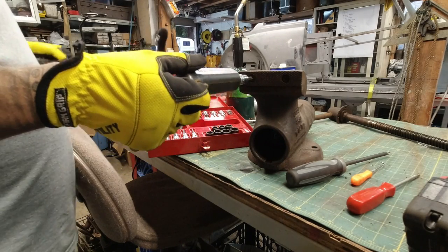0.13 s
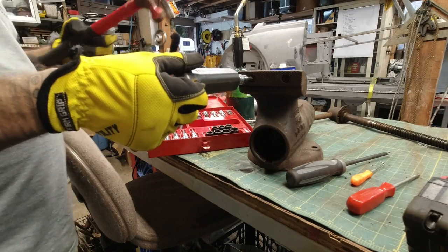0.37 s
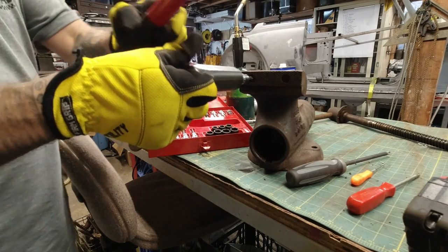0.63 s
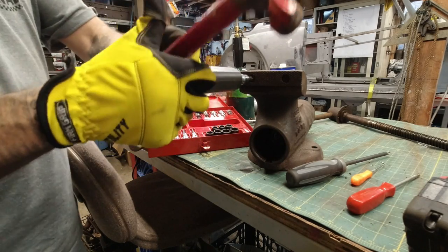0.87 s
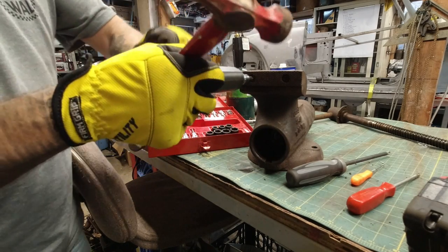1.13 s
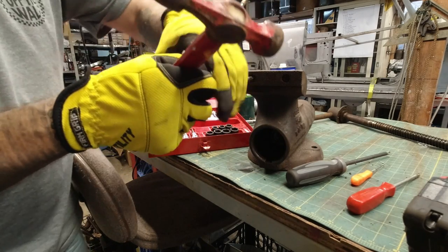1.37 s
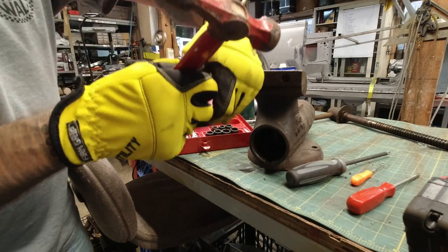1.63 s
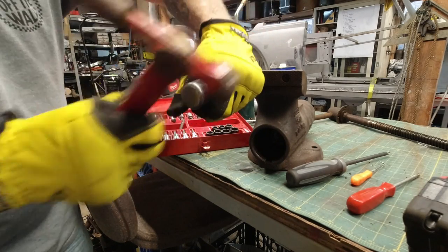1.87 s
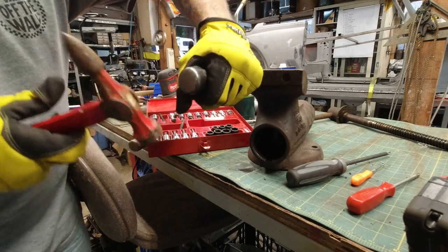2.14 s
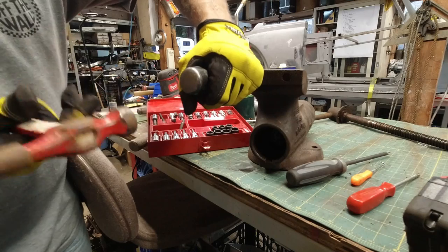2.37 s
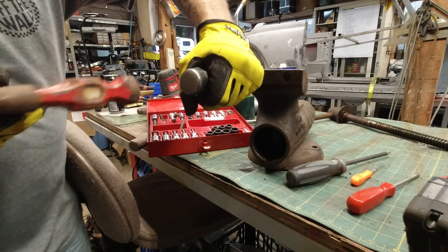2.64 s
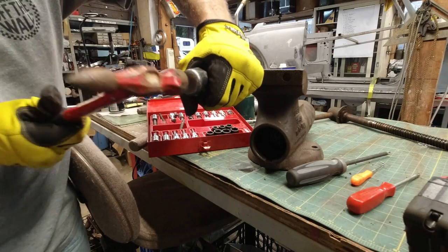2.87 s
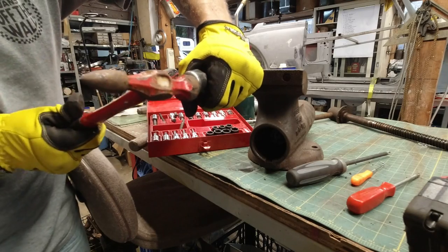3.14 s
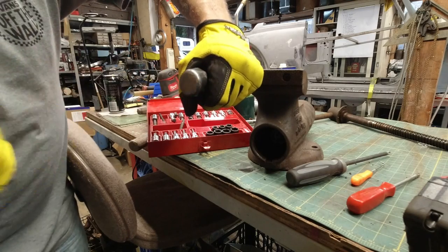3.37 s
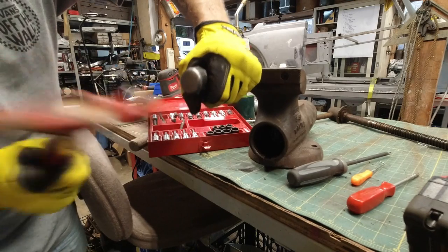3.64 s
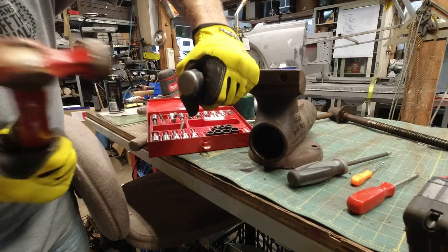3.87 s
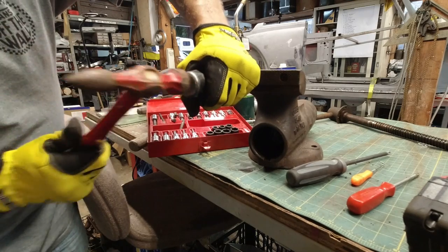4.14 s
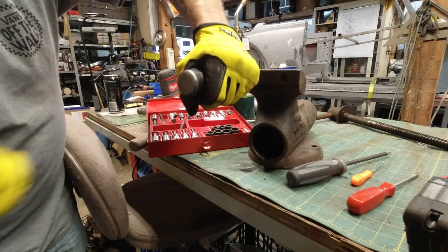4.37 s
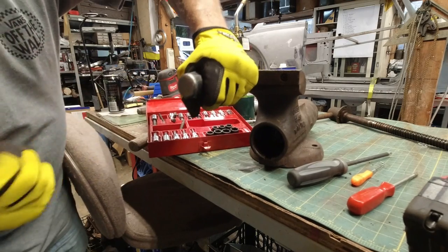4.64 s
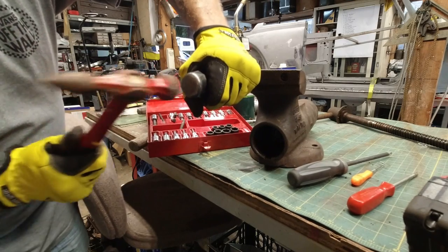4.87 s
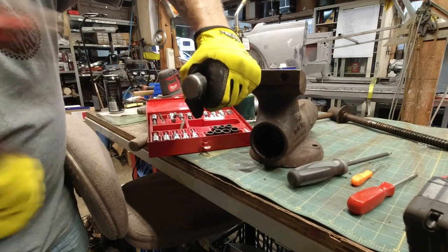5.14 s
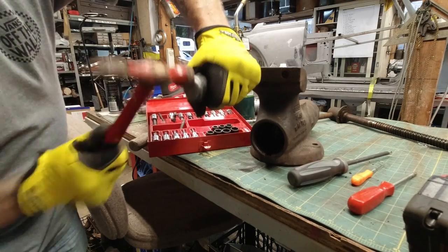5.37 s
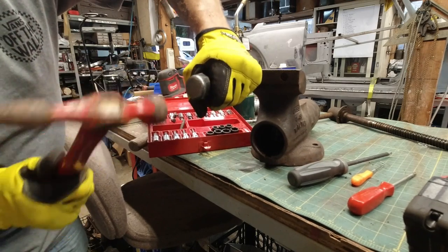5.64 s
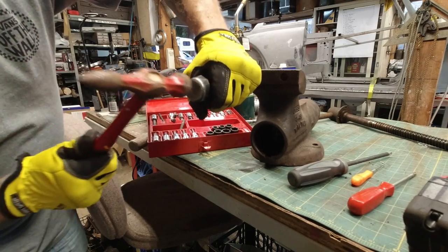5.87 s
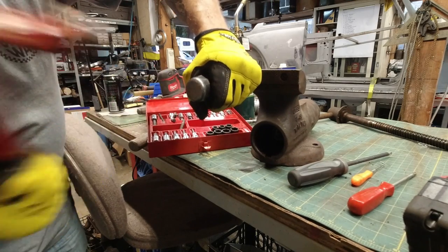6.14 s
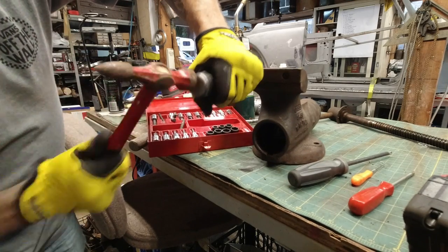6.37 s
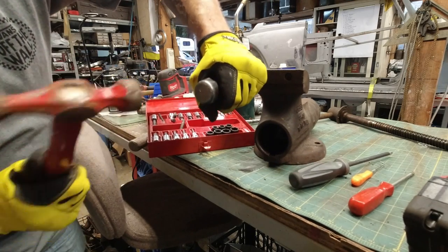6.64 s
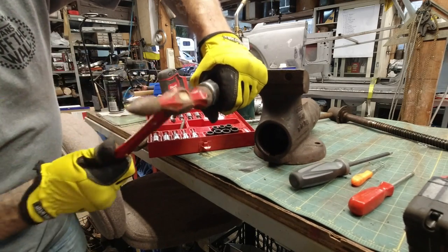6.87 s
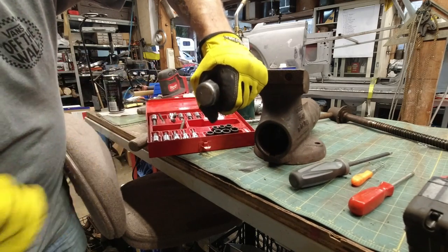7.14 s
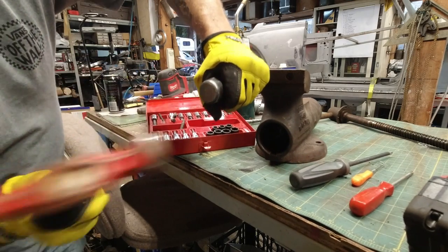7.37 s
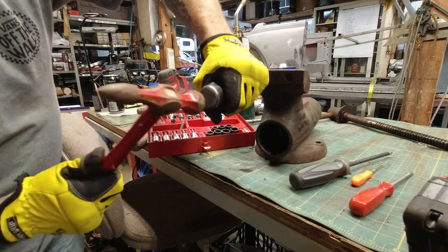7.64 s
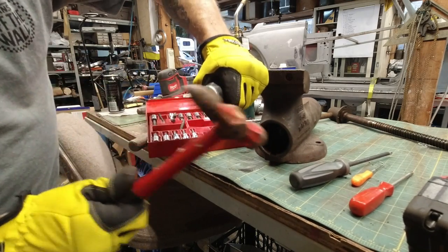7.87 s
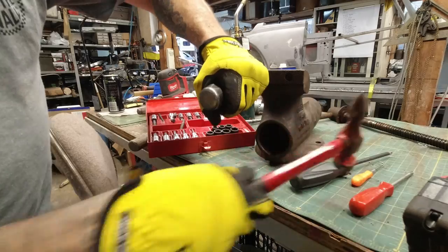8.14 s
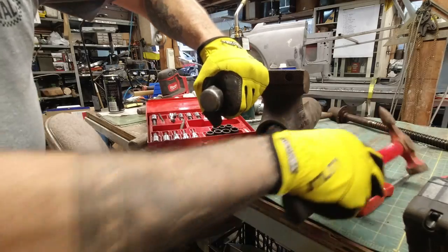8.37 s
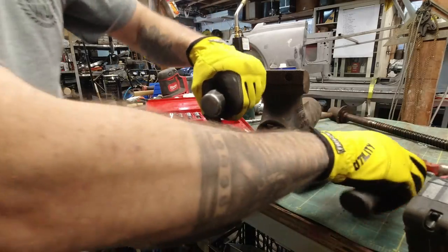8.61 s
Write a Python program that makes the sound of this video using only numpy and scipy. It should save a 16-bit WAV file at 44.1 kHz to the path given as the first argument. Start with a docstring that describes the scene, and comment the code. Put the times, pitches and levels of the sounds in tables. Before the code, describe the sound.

Gloves rustle and a tool handle clacks, then a steel hammer alternates light taps and hard ringing blows on a hand-held driver, ending with a clink.

```python
"""A garage workbench close to a small stereo microphone, over soft room hiss and a wavering low drone.
Gloves slide on the handle first, as shaped noise; handle and driver clack and loose tools knock, as short
resonant ticks. Then a steel hammer strikes a hand-held impact driver set against an iron casting, light aiming
taps and hard blows in turn: a filtered crack, a ringing head, rattle, bench boom and humming sheet steel.
At the end the hammer is laid down and clinks. Struck sounds get a garage tail; a limiter squashes hard blows."""
import sys
import numpy as np
from scipy import signal
from scipy.fft import rfft, irfft, next_fast_len
from scipy.io import wavfile
from scipy.ndimage import map_coordinates

SR = 44100
rng = np.random.default_rng(int(sys.argv[2]) if len(sys.argv) > 2 else 0)


def transcribe(signal):
    """Save signal, clipped to [-1, 1], as a 16-bit WAV file at the path in sys.argv[1]."""
    frames = np.atleast_2d(signal).T
    limited = np.clip(frames, -1, 1)
    pcm = np.round(limited * 32767).astype(np.int16)
    wavfile.write(sys.argv[1], SR, pcm)


def amplitude_ratio(level_db):
    """Convert a level in decibels to the matching linear amplitude (field) ratio."""
    exponent = np.asarray(level_db, float) / 20
    return 10 ** exponent


N = 385875  # samples, 8.75 s


def unit(x):
    """Scaled to rms 1."""
    return x / np.sqrt(np.mean(x ** 2) + 1e-20)


def along(points, hz):
    """Interpolates (Hz, value) points on a log frequency axis."""
    f, v = np.transpose(points)
    return np.interp(np.log(hz + 1), np.log(f + 1), v)


def curves(rows):
    """One value per sample for each column after the time."""
    s, *cols = np.transpose(rows)
    return [np.interp(np.arange(N) / SR, s, c) for c in cols]


def noise(*shape):
    """White Gaussian noise."""
    return rng.standard_normal(shape)


def wobble(rate, size=N):
    """A smooth random curve, rate knots a second."""
    knots = noise(int(size * rate / SR) + 4)
    return map_coordinates(knots, [np.arange(size) * rate / SR])


def filtered(x, response):
    """x times a complex response of frequency."""
    n = x.shape[-1]
    m = next_fast_len(n + 8192)
    return irfft(rfft(x, m) * response(np.fft.rfftfreq(m, 1 / SR)), m)[..., :n]


def resonances(peaks):
    """Causal sum of (Hz, width Hz, dB) resonances with alternating signs."""
    def response(f):
        total = 0
        for k, (centre, width, db) in enumerate(peaks):
            damping = 1j * f * width
            total = total + (-1) ** k * amplitude_ratio(db) * damping / (centre * centre - f * f + damping)
        return total
    return response


def below(hz, order):
    """Causal steep low-pass response."""
    poles = np.exp(1j * np.pi * (np.arange(order) + .5 + order / 2) / order)
    return lambda f: np.prod([-p / (1j * f / hz - p) for p in poles], axis=0)


def diffuse(pair, spectrum=((1, 0),)):
    """Two unrelated signals, coloured and mixed to the likeness of the two microphone ports."""
    # likeness of diffuse sound at the two ports: pitch_hz, likeness (-1 to 1)
    alike = [(60, .86), (180, .9), (550, .78), (1650, .5), (4970, -.05), (15000, 0)]

    def response(hz):
        turn = np.arccos(np.clip(along(alike, hz), -1, 1)) / 2
        return amplitude_ratio(along(spectrum, hz)) * np.array([np.cos(turn), np.sin(turn)])
    mid, side = filtered(pair, response)
    return np.array([mid + side, mid - side])


def rush(spectrum, grain_db):
    """Diffuse stereo noise of rms 1, grainy by fast level scatter."""
    return unit(diffuse(noise(2, N), spectrum) * amplitude_ratio(grain_db * wobble(120)))


def ring(modes, t, spread_db):
    """Damped (Hz, dB, t60 s) modes at freshly scattered strengths for each contact."""
    total = 0
    for hz, db, t60 in modes:
        fade = amplitude_ratio(db + spread_db * rng.standard_normal() - 60 * t / t60)
        total = total + fade * np.sin(2 * np.pi * hz * t)
    return total


def add(out, s, sound, room_db, lead=3):
    """Places a sound, left port first by lead samples, with an early echo and a freshly drawn garage tail."""
    # garage decay: pitch_hz, t60_s
    garage = [(100, 0.68), (500, 0.5), (2000, 0.31), (5000, 0.31), (11500, 0.18), (13500, 0.015)]
    # echo off the bench top: delay_s, level_db
    echoes = [(.006, -14)]
    hz, t, z = signal.stft(noise(2, SR // 2), SR, nperseg=256)
    decay = amplitude_ratio(-60 * t / along(garage, hz)[:, None])
    tail = diffuse(signal.istft(z * decay, SR, nperseg=256)[1])
    fade_in = np.minimum(np.arange(tail.shape[1]) / (0.0011 * SR), 1)
    tail = amplitude_ratio(room_db) * tail / np.linalg.norm(tail[0]) * fade_in
    for delay, db in [(0, 0), *echoes]:  # direct sound, then the echo
        left = round(delay * SR)
        tail[[0, 1], [left, left + lead]] += amplitude_ratio(db)
    heard = signal.fftconvolve(np.atleast_2d(sound), tail, axes=1)
    out[:, round(s * SR):][:, :heard.shape[1]] += heard


def room_tone():
    """Soft hiss and fluttering rumble, as coloured noise, under a low sine drone of wavering pitch."""
    # drone pitch, about which it wavers; it drops once: time_s, pitch_hz
    drone_pitch = [(0, 54.3), (2.7, 54), (2.9, 51.03), (8.75, 52)]
    # the drone comes and goes: time_s, level_db
    drone_level = [(0, -62.5), (.25, -52.5), (.6, -49.5), (.8, -54), (.93, -44.5), (1.32, -56.5),
                   (1.46, -47), (1.84, -47.5), (1.97, -63), (2.53, -74), (2.59, -38.5), (2.68, -48.5),
                   (2.78, -59), (2.85, -57), (2.9, -48), (3.02, -41.5), (3.11, -47), (3.18, -59),
                   (3.3, -45.5), (3.42, -56.5), (3.5, -47), (3.6, -70), (3.77, -53.5), (4.2, -58),
                   (5.4, -64.5), (8.75, -73.5)]
    # room noise: time_s, hiss_db, rumble_db
    air = [(0, -61.5, -71), (1.2, -59, -59.5), (2.3, -59, -67), (3.5, -62.5, -71), (4.5, -68, -72),
           (5.4, -68.5, -64), (6.4, -70, -63), (7.3, -70, -66), (8, -70.5, -77.5), (8.75, -69, -76.5)]
    # relative hiss spectrum: pitch_hz, density_db (per Hz)
    air_colour = [(41, -26), (70, 3), (107, -7), (152, -9), (232, -6), (321, -19.5), (363, -12), (545, -19),
                  (924, -18), (3910, -31.5), (9000, -49.5), (11700, -82), (19800, -120)]
    # relative rumble spectrum: pitch_hz, density_db (per Hz)
    rumble_colour = [(10, -4), (25, 6), (36, 0), (52, 4.5), (75, -25), (120, -51.5)]
    (hz,), (db,) = curves(drone_pitch), curves(drone_level)
    phase = 2 * np.pi * np.cumsum(hz + 2.0 * wobble(1.5)) / SR
    drone = np.sqrt(2) * amplitude_ratio(db) * np.sin(phase + [[.2], [-.2]])
    hiss_db, rumble_db = curves(air)
    hiss = amplitude_ratio(hiss_db + 1.1 * wobble(1.0)) * rush(air_colour, 0.44)
    rumble = amplitude_ratio(rumble_db + 10.0 * wobble(22)) * rush(rumble_colour, .1)
    return drone + hiss + rumble


def strokes(start, rise, hold, db, fade_db):
    """Gain of strokes that swell in an arch, hold, then die away by fade_db a second."""
    rise_db = 34.5  # swell from the start time to the full level
    t = np.arange(0, N / SR, .001)
    s, r, h, d = (np.asarray(c)[:, None] for c in (start, np.maximum(rise, .003), hold, db))
    swell = rise_db * (np.clip(s + r - t, 0, 4 * r) / r) ** 2
    fade = fade_db * np.clip(t - s - r - h, 0, None)
    gain = amplitude_ratio(d - swell - fade)
    return np.interp(np.arange(N) / SR, t, gain.sum(0))


def gloves():
    """Sliding friction as noise strokes: leather rasp, fine hiss of the weave and a dull rub of cloth."""
    # gloves sliding: start_s, rise_s, hold_s, rasp_db, weave_hiss_db
    slides = [(.085, 0.024, 0.042, -58.5, -58.5), (.84, 0.029, 0.012, -58.5, -109),
              (.96, 0.12, 0.017, -49, -95), (1.405, 0.081, 0.052, -35, -47), (1.64, 0.083, 0.043, -57, -95),
              (1.74, 0.084, 0.043, -43, -67), (1.883, 0.065, 0.042, -62, -70),
              (2.555, 0.09, 0.05, -48, -45), (2.82, 0.051, 0.13, -67.5, -99),
              (3.54, 0.16, 0.016, -46, -59.5), (8.37, 0.052, 0.025, -70.5, -100),
              (8.47, 0.029, 0.0091, -65, -100), (8.565, 0.018, .11, -48, -56.5)]
    # dull rubs of cloth: start_s, rise_s, hold_s, level_db
    rubs = [(0.098, 0.053, 0.12, -51), (0.48, 0.046, 0.078, -63), (1.417, .04, 0.089, -54.5),
            (1.542, 0.03, 0.023, -51), (1.686, 0.07, 0.24, -59.5), (2.55, 0.014, 0.0078, -58),
            (2.808, 0.058, 0.01, -47), (3.58, 0.046, 0.023, -71), (8.216, 0.04, .01, -66)]
    # relative spectra of rasp, weave and rub: pitch_hz, density_db (per Hz)
    leather, weave, cloth = [(180, -44.5), (300, -7), (707, -4), (908, -1.5), (1120, -2), (1800, -3.5),
                             (3970, -4), (7000, -25), (9100, -66), (15400, -120)], [(2940, -14.5), (5000, -2), (7450, -7.5), (9600, -3.5),
                                              (14300, -27), (15400, -25), (16000, -71.5)], [(47, -36), (80, -13.5), (205, -4.5),
                                                             (418, -8.5), (474, -10), (1200, -33.5),
                                                             (1560, -59), (2640, -120)]
    *when, rasp_db, hiss_db = np.transpose(slides)
    rasp = strokes(*when, rasp_db, fade_db=208)
    hiss = strokes(*when, hiss_db, fade_db=356.5)
    rub = strokes(*np.transpose(rubs), fade_db=127)
    return rasp * rush(leather, 1.9) + hiss * rush(weave, 1.2) + rub * rush(cloth, 1.6)


def knock(out, rows, contact_s, upper_db, bite_db, room_db):
    """Adds scratchy ticks around a centre pitch, each with a wooden thump; harder contacts are shorter."""
    harder_shorter = 0.37  # dB of contact time per dB of force
    t = np.arange(SR // 8) / SR
    wooden = resonances([(170.0, 61, 9.5), (270, 110, 4.5), (410, 160, 2), (650, 160, -5), (900, 400, -5)])
    for s, db, hz, thump_db in rows:
        length = contact_s * amplitude_ratio(-harder_shorter * db)
        envelope = np.exp(-t / length) * (1 - np.exp(-t / (0.13 * length)))
        hit = envelope * (1 + noise(len(t)))
        # each tool has its own few tones
        near = hz * np.array([.45, .66, 1, 1.33, 1.8]) * amplitude_ratio(.4 * noise(5))
        tones = zip(near, 0.17 * near, [-4.0, -1.5, 2.5, -5.5, -3.5])
        body = resonances([*tones, (1.3 * hz, 2.0 * hz, upper_db), (3900, 2800, bite_db)])

        def response(f):
            dulling = (1 + 1j * f * np.sqrt(length) / 450) ** 3  # longer contact dulls the top
            return body(f) * below(6500, order=3)(f) / dulling
        tick = filtered(hit, response)
        wood = filtered(hit, wooden)
        sound = tick / np.abs(tick).max() + amplitude_ratio(thump_db) * wood / np.abs(wood).max()
        add(out, s, amplitude_ratio(db) * sound, room_db)


def clinks(out):
    """The hammer head touches a screwdriver: a noisy steel tick and the ring of its shaft."""
    # touches: time_s, level_db
    touches = [(8.712, -9), (8.746, -25)]
    # screwdriver shaft: pitch_hz, level_db, t60_s
    shaft = [(1550, -4, .035), (3155, 0, .03), (4737, -15, .03), (5313, -15, .04), (8963, -22, .02),
             (11300, -22, .04)]
    t = np.arange(SR // 8) / SR
    body = resonances([(3550, 6000, -1.5)])
    for s, db in touches:
        burst = np.exp(-t / 0.0019) * noise(len(t))
        tick = filtered(burst, lambda f: body(f) / (1 + 1j * f / 10500) ** 3)
        add(out, s, amplitude_ratio(db) * (0.42 * ring(shaft, t, 0.7) + tick), room_db=-4.0)


def pings(out):
    """Loose steel bits left ringing, each a single damped mode that swells in softly."""
    # bits: time_s, pitch_hz, level_db, t60_s
    bits = [(2.76, 2280, -61, 0.77), (3.912, 656, -43.5, 0.65), (3.991, 3560, -67, 0.75),
            (4.89, 2530, -67.5, 1), (5.67, 641, -44.5, .4), (5.722, 3580, -62.5, 0.88),
            (6.75, 3130, -73.5, 0.75)]
    t = np.arange(SR) / SR
    for s, *mode in bits:
        out[:, round(s * SR):][:, :SR] += ring([mode], t, 0.83) * (1 - np.exp(-t / 0.024))


def tools():
    """Resonant contacts: dry clacks in the hands, wetter knocks on the bench, clinks and pings of steel."""
    # tools jumping on the bench, hammer laid down: time_s, tick_db, centre_hz, thump_db (over the tick)
    knocks = [(0.413, -55, 2020, -28), (3.911, -27.5, 1110, -5.5), (3.982, -33, 1275, -5),
              (4.041, -39, 1220, -5), (4.142, -47.5, 930, -25.5), (4.771, -39.5, 980, -23),
              (4.844, -44, 611, 2), (5.667, -31.5, 1164, -4.5), (5.723, -31.5, 625, -14.5),
              (5.897, -50, 1300, 2.5), (6.66, -38.5, 1175, -6), (6.707, -36, 960, -14),
              (6.748, -50, 1125, 5), (7.548, -32.5, 620, -36), (7.629, -43, 590, -6.5),
              (8.582, -22.5, 1002, -4), (8.6, -42.5, 1020, 9.5), (8.667, -26.5, 1080, 1),
              (8.7, -26.5, 1110, -1.5)]
    # handle and driver clack in the hands: time_s, tick_db, centre_hz
    grip = [(0.823, -43, 3640), (1.0405, -9.5, 1640), (1.048, -17.5, 1820), (1.056, -29, 1800),
            (1.141, -24, 1570), (1.149, -32, 1400), (1.96, -40, 3570)]
    out = np.zeros((2, N + 2 * SR))
    # contact_s is the contact time at 0 dB
    knock(out, [(*row, -35) for row in grip], contact_s=0.0013, upper_db=-2.0, bite_db=-7, room_db=-13)
    knock(out, knocks, contact_s=0.0026, upper_db=-5, bite_db=-10, room_db=-5)
    clinks(out)
    pings(out)
    return out[:, :N]


def steel_crack(t, contact_ms, rebound_ms):
    """Contact force of steel on steel through resonances, at peak 1; longer contact dulls it."""
    # crack resonances: centre_hz, width_hz, level_db
    peaks = [(500, 500, -9), (1290, 900, -4.5), (2050, 650, 1), (3200, 990, -4.5), (4760, 420, 8),
             (9500, 4000, -12)]
    touch = t / .00004 * np.exp(1 - t / .00004)
    # the faces meet twice
    push = -touch - 0.5 * np.roll(touch, 36) + 1.1 * np.exp(-t / 0.00052) * noise(len(t))
    # the driver springs back against the face
    push = push + amplitude_ratio(-19.5) * np.roll(push, round(rebound_ms / 1000 * SR))
    # bit and screw chatter briefly
    push = push + amplitude_ratio(-22 + 3.7 * wobble(400, size=len(t))) * np.exp(-t / 0.03) * noise(len(t))

    def response(f):
        dulling = (1 + 2j * np.pi * f * contact_ms / 1000) ** 2
        return resonances(peaks)(f) * below(11800, order=10)(f) / dulling
    crack = filtered(push, response)
    return crack / np.abs(crack).max()


def sizzle(t):
    """Brief top of a hard blow: decaying noise high in the treble."""
    # relative spectrum: pitch_hz, density_db (per Hz)
    colour = [(11000, -42), (12500, -0.5), (15700, 1), (16500, -24.5)]
    return unit(diffuse(noise(2, len(t)), colour)) * np.exp(-t / 0.018)


def head_ring(t, low_db, high_db, hard):
    """Damped modes of the hammer head, fluttering; a hard blow chokes them and flutters them more."""
    # bending family and end-to-end family: pitch_hz, level_db, t60_s
    bending, end_to_end = [(2525, -13, .09), (4710, -13, .05), (4975, -9, .07), (5090, -5, .1),
                           (5125, -1, .21), (5162, -4, .12), (5230, -8, .09), (5410, -14, .06),
                           (5755, -20, .06), (6210, -18, .06)], [(9400, -14, .02), (9870, -15, .03), (10450, -12, .025),
                                             (10800, -9, .025), (11090, -3, .03), (11245, 0, .045),
                                             (11345, -4, .04), (14300, -14, .08)]
    head = amplitude_ratio(low_db) * ring(bending, t, 2) + amplitude_ratio(high_db) * ring(end_to_end, t, 2.5)
    flutter_db = (2.2 + 2.2 * hard) * wobble(110, size=len(t))
    choke_db = hard * 300 * t
    return head * amplitude_ratio(flutter_db - choke_db) * (1 - np.exp(-t / .0006))


def rattle(t):
    """Casting and loose parts shaken: lumpy coloured noise in uneven bursts."""
    # relative spectrum: pitch_hz, density_db (per Hz)
    colour = [(24, -39), (40, -22), (412, -11.5), (1810, -12), (2570, -11.5), (3740, -13), (4800, -10),
              (5180, -10), (6490, -22.5), (11000, -15), (16000, -51)]
    hz = np.arange(30, 16000, 45)
    lumpy = np.c_[hz, along(colour, hz) + 4.5 * noise(len(hz))]  # each blow wakes other small parts
    chatter = amplitude_ratio(3.5 * wobble(90, size=len(t)))  # loose parts touch in uneven bursts
    shaken = unit(diffuse(chatter * noise(2, len(t)), lumpy))
    return shaken * (1 - np.exp(-t / 0.008)) * np.exp(-t / 0.039)


def bench_boom(t):
    """Bench top flexing: low noise that swells late, as the heavy top lags, and shudders unevenly."""
    # relative spectrum: pitch_hz, density_db (per Hz)
    colour = [(20, -14), (50, -9.5), (90, -18), (150, -7.5), (200, -2.5), (300, -4), (550, -9),
              (1000, -39.5)]
    boom = unit(diffuse(noise(2, len(t)), colour)) * t / 0.064 * np.exp(1 - t / 0.026)
    return boom * amplitude_ratio(4 * wobble(45, size=len(t)) - 1.5)


def casting_clang(t):
    """The iron casting rocks on the bench: its modes struck by 20 random jolts that weaken."""
    # casting and bench top: pitch_hz, level_db, t60_s
    modes = [(140, -6, .12), (199, -4, .22), (269, -2, .1), (340, -4, .08), (420, -3, .09), (520, -2, .09),
             (600, -4, .08), (700, -4, .08), (807, -4, .08), (940, -5, .08), (1030, -6, .08),
             (1200, -7, .07), (1378, -7, .07), (1690, -9, .06)]
    jolts_s = .05  # mean delay of a jolt
    when, force = rng.random((2, 20))
    jolt_samples = (-np.log(1 - when) * jolts_s * SR).astype(int)
    jolts = np.bincount(jolt_samples, (2 * force - 1) * np.sqrt(1 - when))
    struck = ring(modes, t, 3.8) * np.cos(np.pi / 2 * t / t[-1])
    return amplitude_ratio(-14.5) * signal.fftconvolve(struck, jolts)[:len(t)]


def sheet_hum():
    """Thin sheet steel on the bench hums after a blow: slow modes with a soft onset."""
    # sheet modes: pitch_hz, level_db, t60_s
    modes = [(438, -0.5, 1), (895, -7.5, 0.54)]
    t = np.arange(SR) / SR
    return ring(modes, t, 1.2) * (1 - np.exp(-t / 0.0065))


def hammer():
    """Each contact cracks, rings the head, and shakes casting, bench and sheet steel."""
    # hammer contacts, with the gain of each layer: time_s, crack_db, contact_ms, low_ring_db, high_ring_db,
    # rattle_db, boom_db, sheet_db, rebound_ms
    blows = [(3.1531, -9, 0.024, -26, -35.5, -37.5, -38.5, -44.5, 32),
             (3.671, -14.5, 0.011, -12, -1, -11.5, -15.5, -58, 33),
             (4.234, -9.5, 0.019, -61.5, -64.5, -47.5, -45, -49.5, 22),
             (4.591, -16.5, .015, -19.5, -8, -15, -25.5, -64.5, 26),
             (4.614, -24.5, 0.034, -10.5, -16.5, -21.5, -20.5, -70, 21),
             (5.0688, -6.5, 0.015, -39.5, -35.5, -70, -47.5, -53.5, 13),
             (5.4751, -11.5, 0.078, -52, -25, -26, -25.5, -54, 18),
             (5.5101, -7.5, 0.35, -30.5, -23, -18, -25, -59, 26),
             (6.0571, -5.5, 0.017, -30.5, -33, -48, -50.5, -55, 31),
             (6.4704, -10.5, .012, -13, -7, -13, -20.5, -66.5, 28),
             (6.9691, -0.5, 0.006, -31, -23.5, -50, -64.5, -63, 21.4),
             (7.3883, -14.5, 0.019, -20, -14.5, -13.5, -32.5, -54, 26)]
    loose_db, shaken_db = -40, -13  # rattle at which the ring starts to roughen, and is roughest
    out, t = np.zeros((2, N + 2 * SR)), np.arange(SR // 3) / SR
    for s, crack_db, contact_ms, low_db, high_db, rattle_db, boom_db, sheet_db, rebound_ms in blows:
        hard = np.clip((rattle_db - loose_db) / (shaken_db - loose_db), 0, 1)
        crack = amplitude_ratio(crack_db) * steel_crack(t, contact_ms, rebound_ms)
        add(out, s, crack + hard * amplitude_ratio(rattle_db + 4) * sizzle(t), room_db=-19)
        shaking = amplitude_ratio(rattle_db) * rattle(t) + amplitude_ratio(boom_db) * (bench_boom(t) + casting_clang(t))
        add(out, s, shaking, room_db=-9.5)
        add(out, s, head_ring(t, low_db, high_db, hard), room_db=-6 + 9 * hard, lead=2)
        out[:, round(s * SR):][:, :SR] += amplitude_ratio(sheet_db) * sheet_hum()
    return out[:, :N]


def scene():
    """Everything the two microphone ports hear."""
    return room_tone() + gloves() + tools() + hammer()


def follow(x, release_db):
    """Peak level in dB: jumps up at once, falls by release_db a second."""
    fall = release_db * np.arange(len(x)) / SR
    return np.maximum.accumulate(20 * np.log10(x + 1e-9) + fall) - fall


def roll_off(x):
    """The treble ends steeply here."""
    return signal.sosfilt(signal.butter(12, 16990, fs=SR, output="sos"), x)


def record(dry):
    """A limiter lets the first crack through, squashes the hard blows and lets the room swell back up."""
    # microphone port colour: pitch_hz, level_db
    port = [(6000, 1.5), (7300, -1.5), (9500, 1), (12000, -4.5), (16000, -19)]
    top_db, ratio, attack = -6, 3, 100  # attack in samples
    heard = filtered(dry, lambda hz: amplitude_ratio(along(port, hz)))
    level_db = follow(np.abs(heard).max(0), release_db=349.5)
    need = (1 + amplitude_ratio(level_db - top_db) ** 2) ** (-(1 - 1 / ratio) / 2)
    window = np.hanning(attack)
    gain = signal.lfilter(window / window.sum(), 1, need - 1) + 1  # the gain lags behind the need
    heard = heard * gain
    heard = heard / (1 + np.abs(heard / .76) ** 6) ** (1 / 6)  # soft ceiling
    heard = filtered(heard, below(16500, order=12))
    return roll_off(heard)


dry = scene()
out = record(dry)
transcribe(out)
```